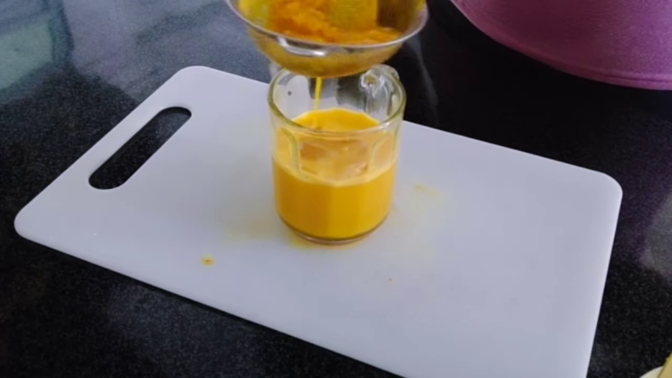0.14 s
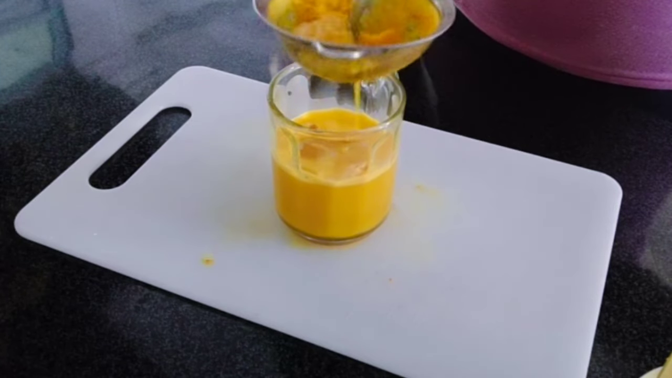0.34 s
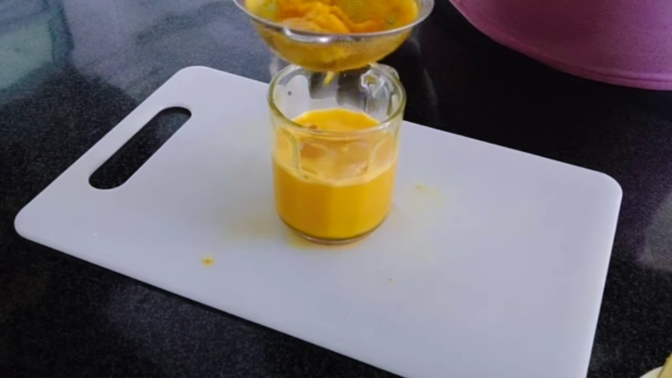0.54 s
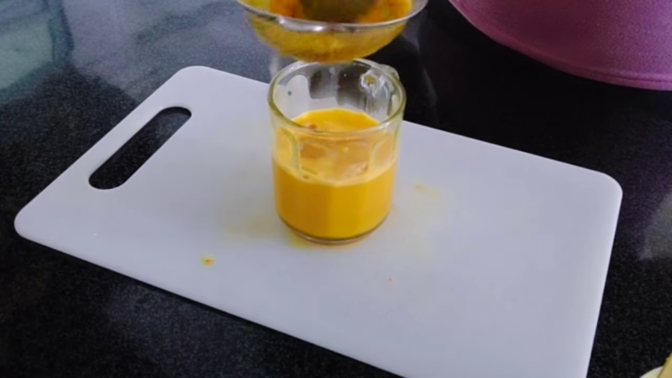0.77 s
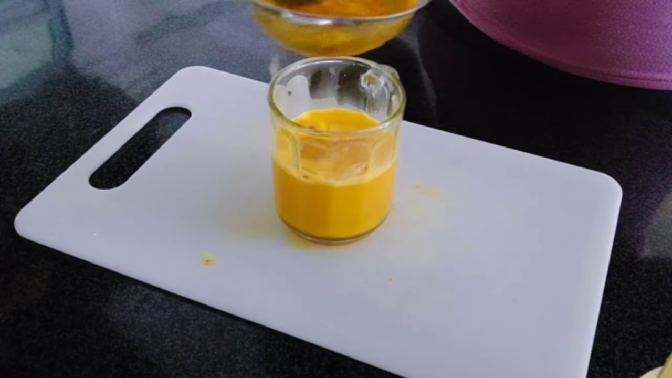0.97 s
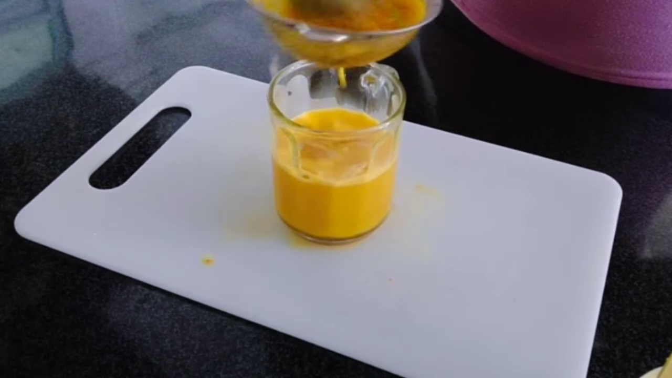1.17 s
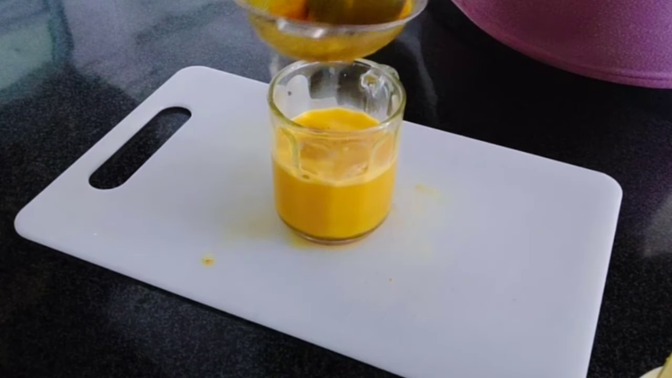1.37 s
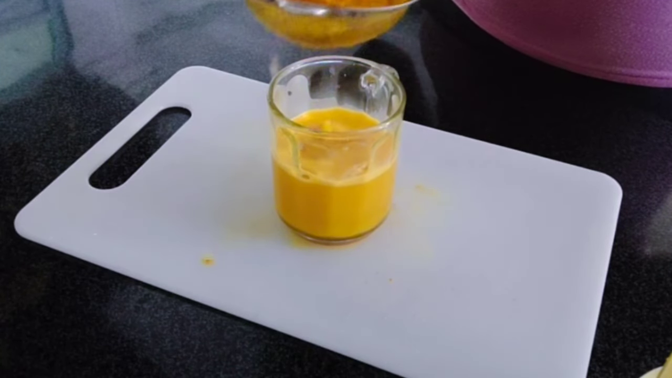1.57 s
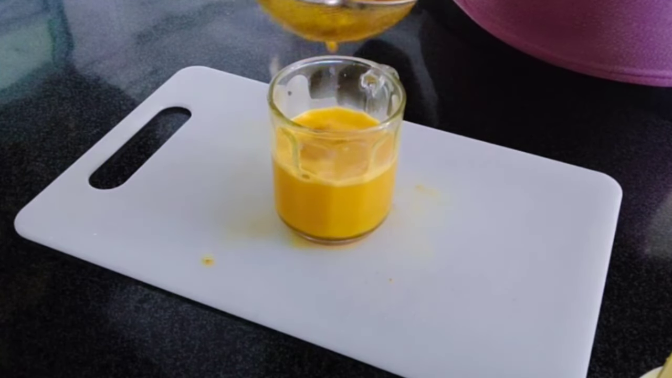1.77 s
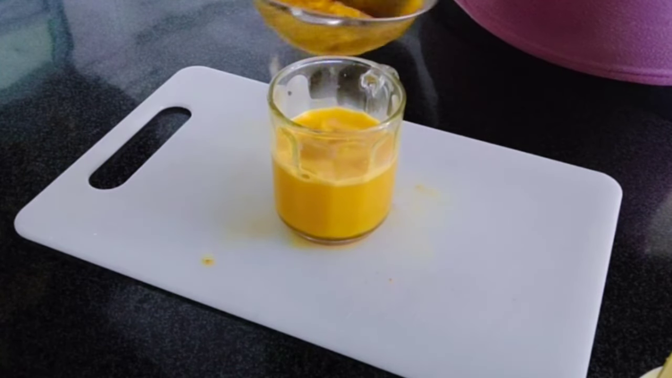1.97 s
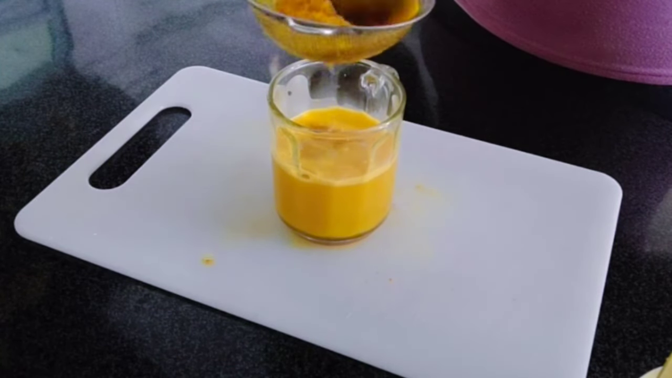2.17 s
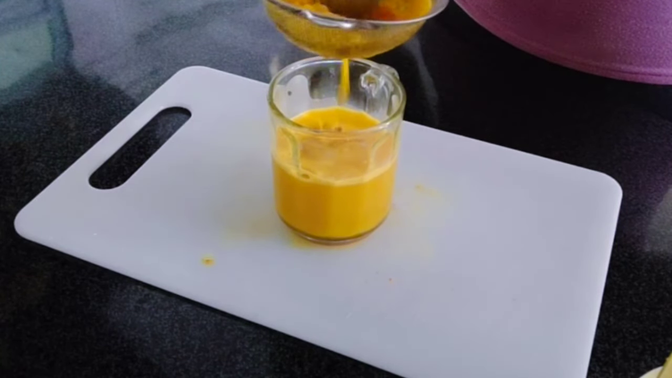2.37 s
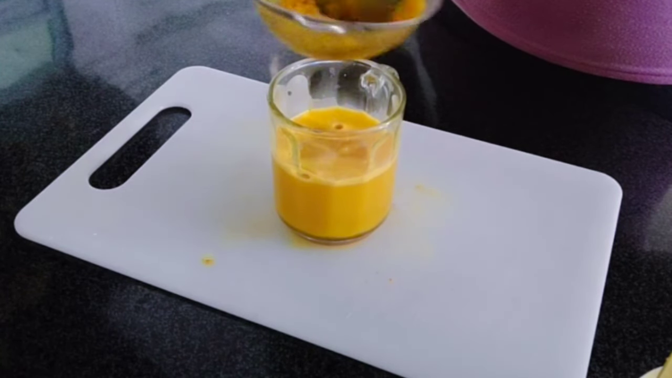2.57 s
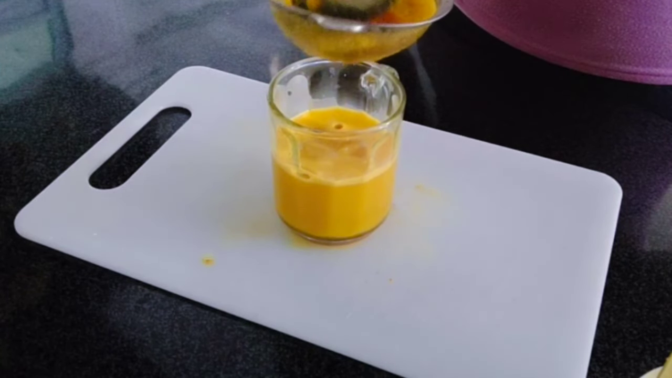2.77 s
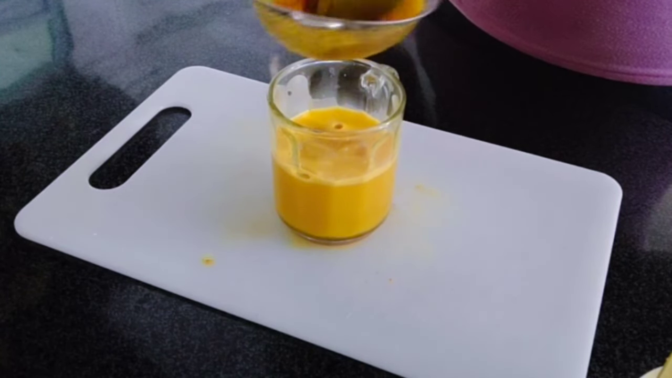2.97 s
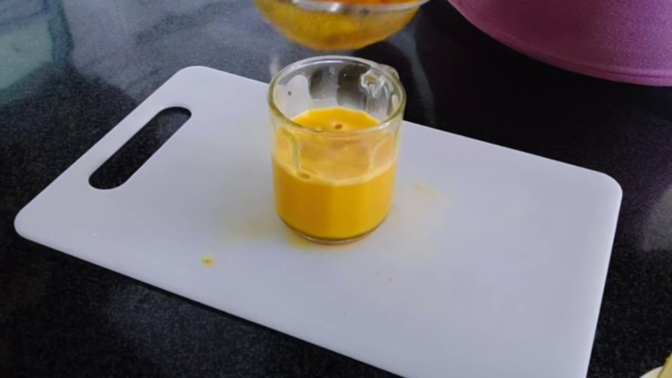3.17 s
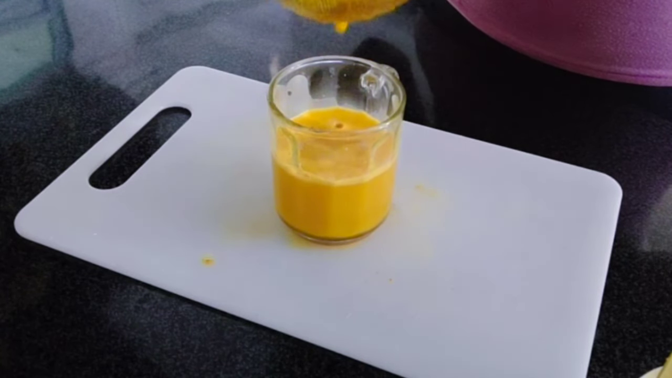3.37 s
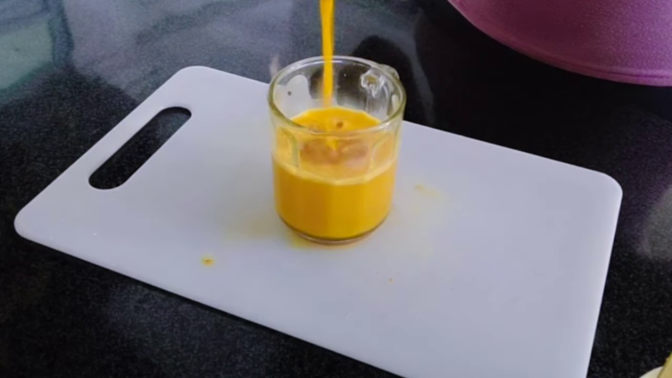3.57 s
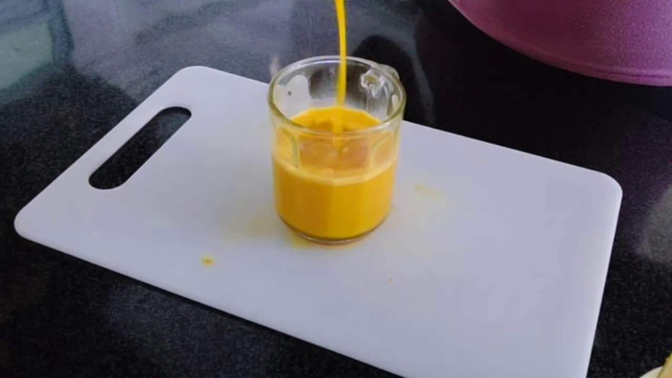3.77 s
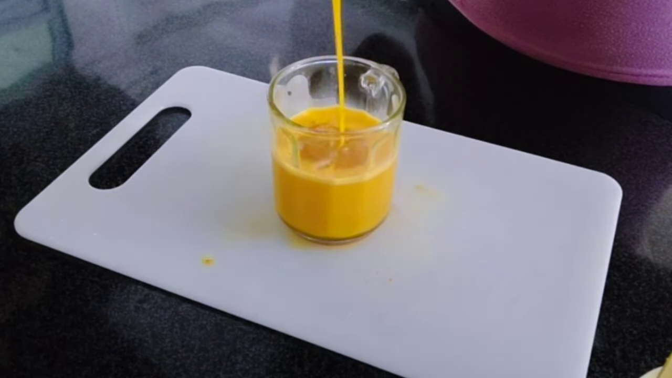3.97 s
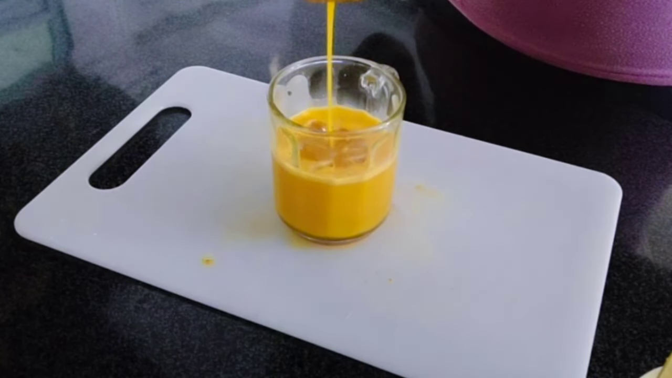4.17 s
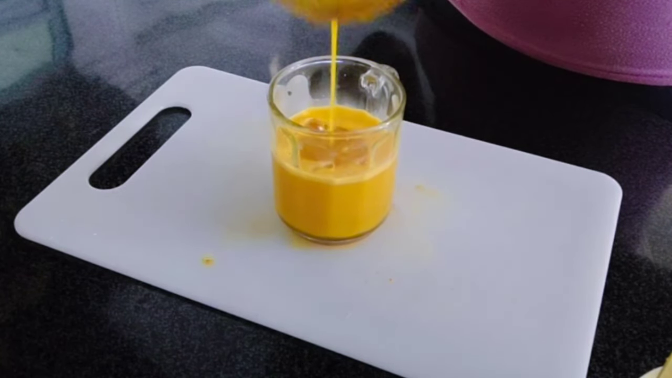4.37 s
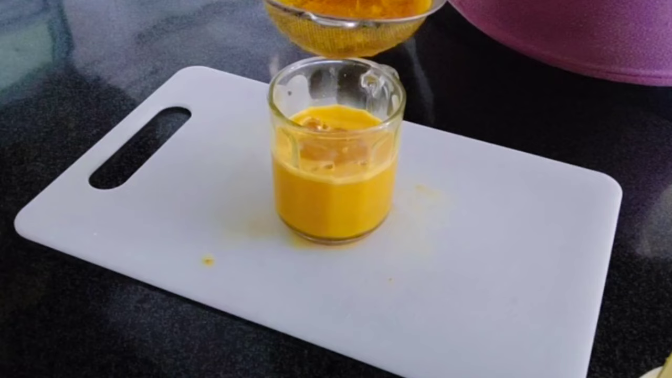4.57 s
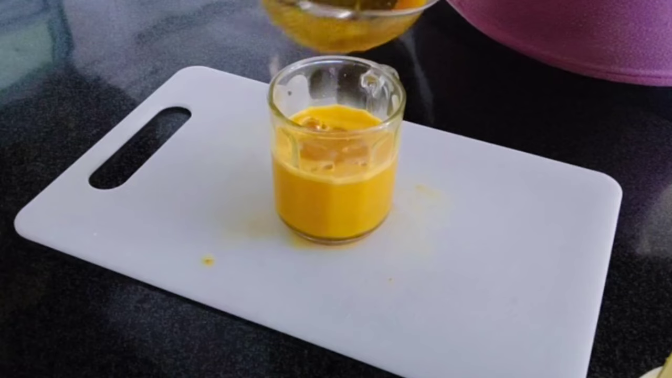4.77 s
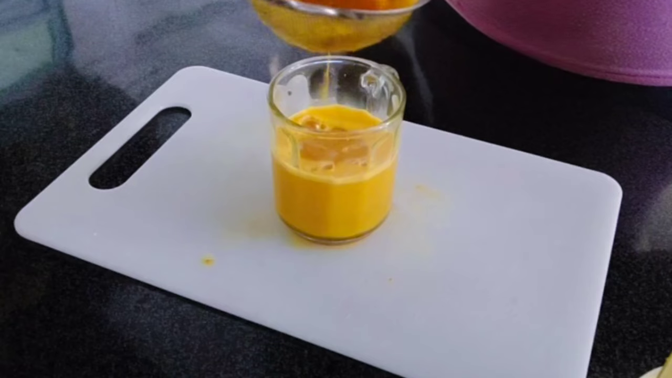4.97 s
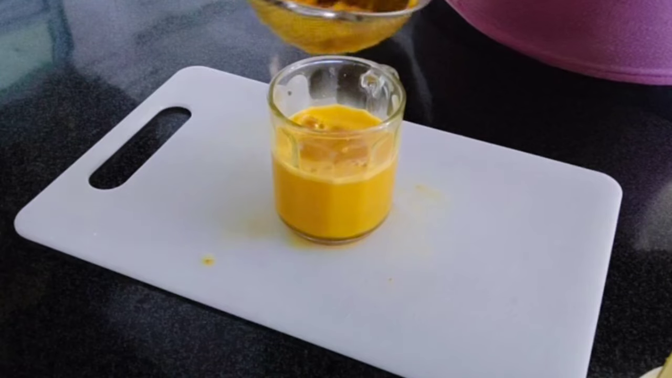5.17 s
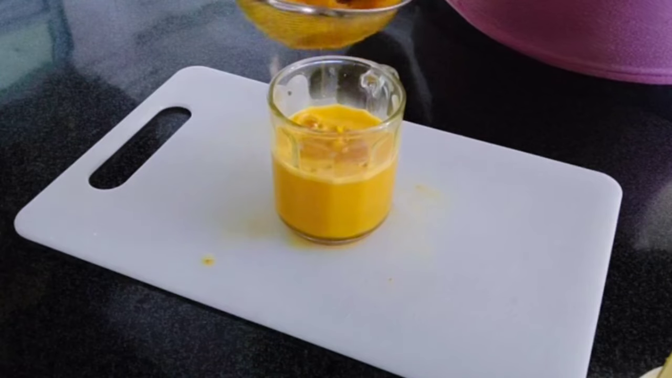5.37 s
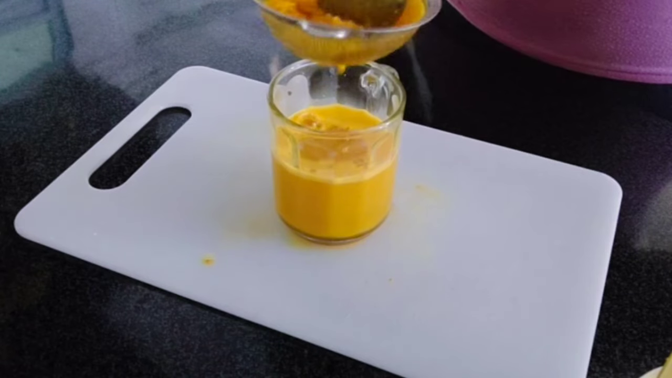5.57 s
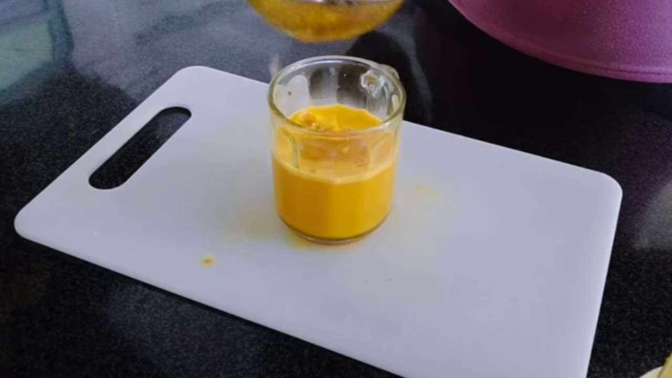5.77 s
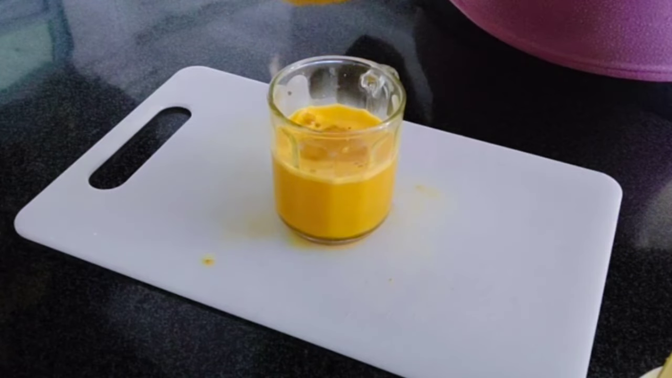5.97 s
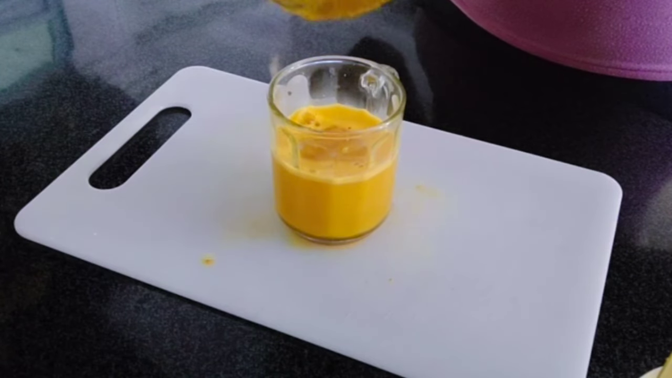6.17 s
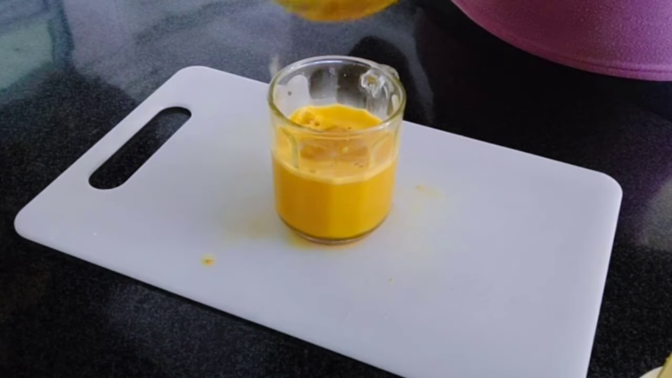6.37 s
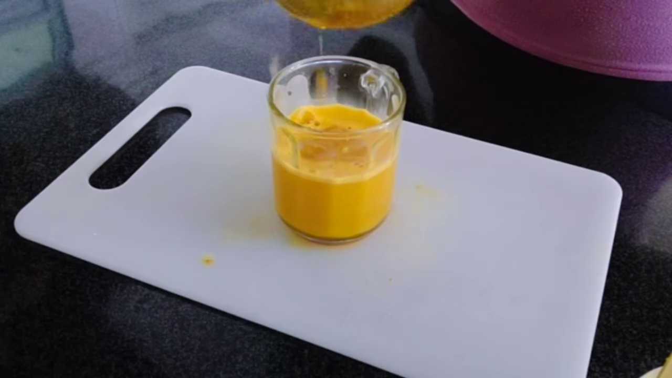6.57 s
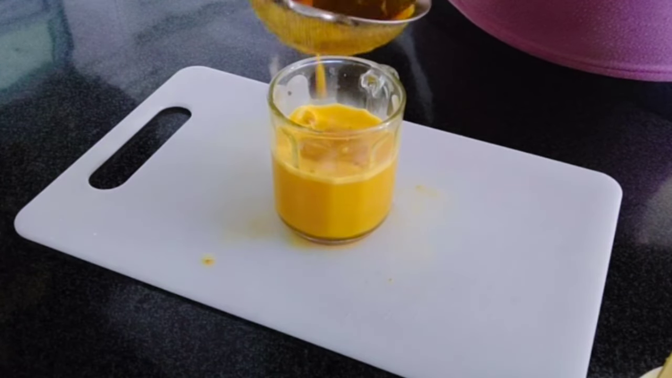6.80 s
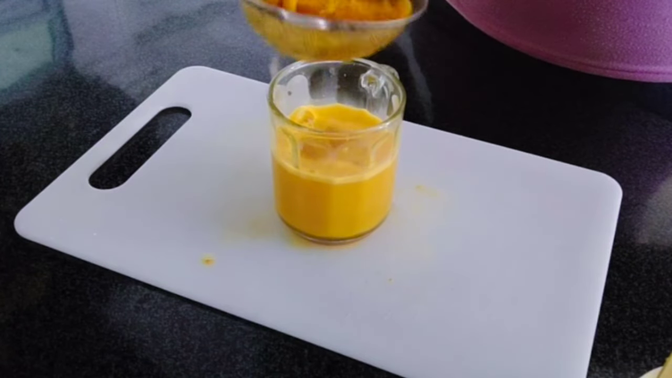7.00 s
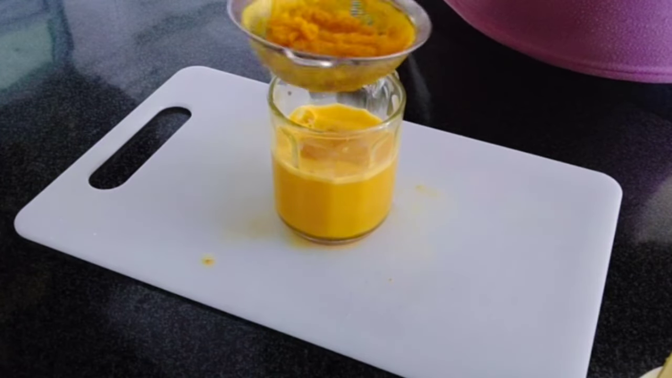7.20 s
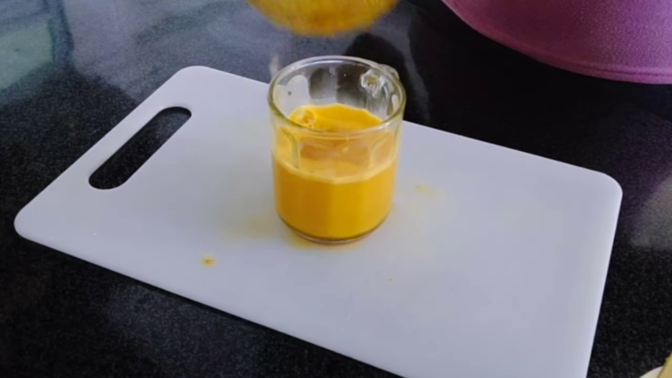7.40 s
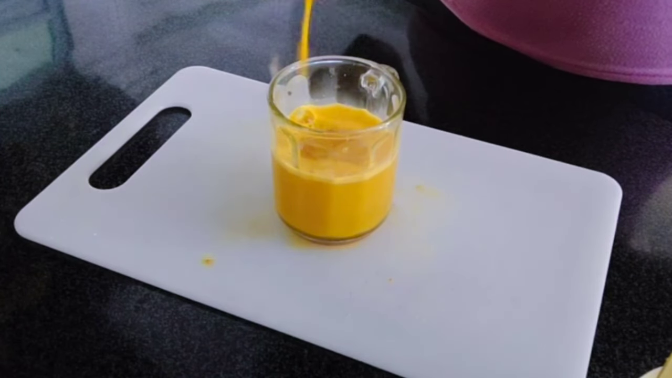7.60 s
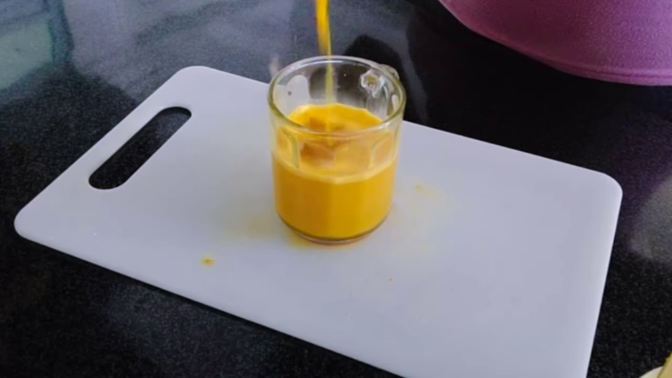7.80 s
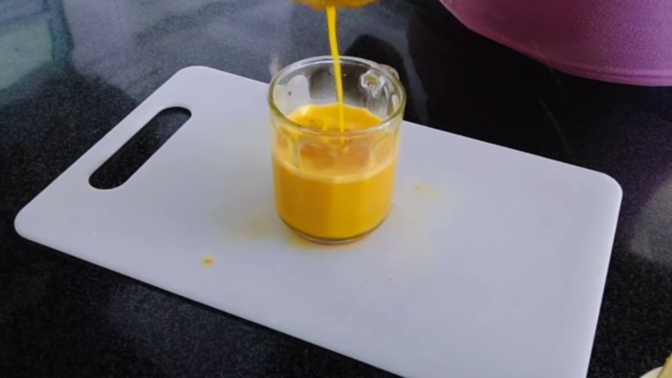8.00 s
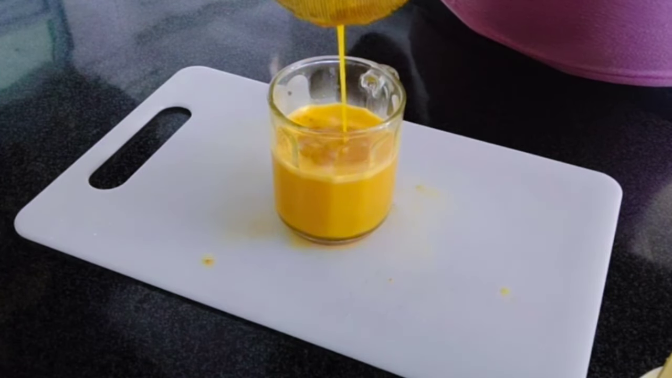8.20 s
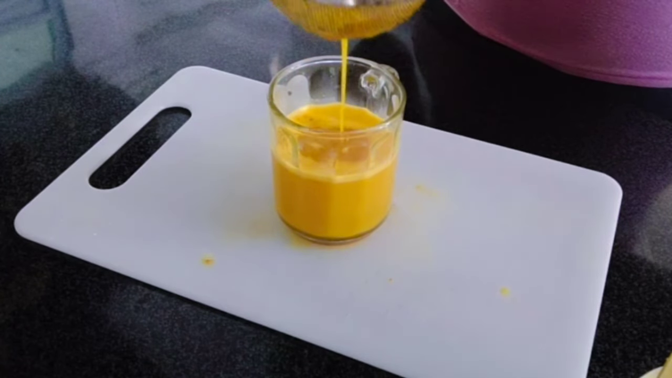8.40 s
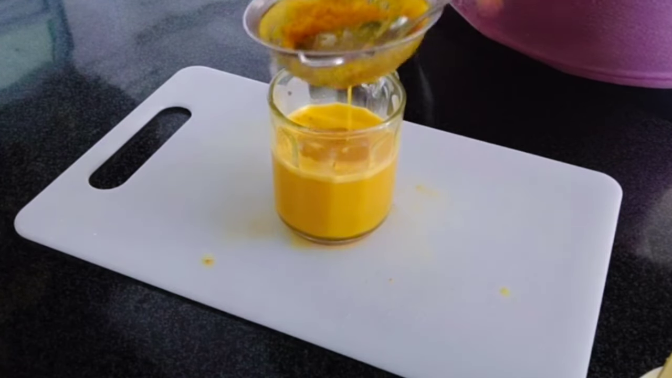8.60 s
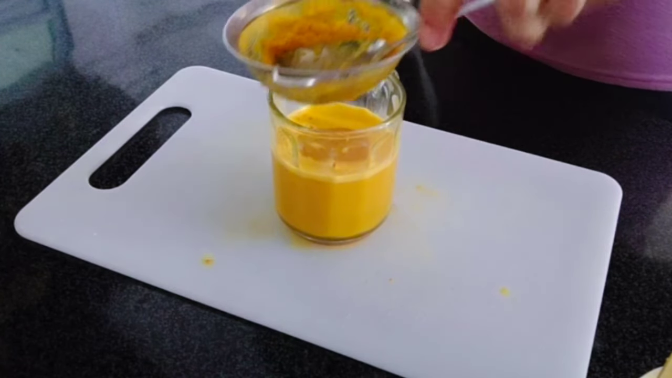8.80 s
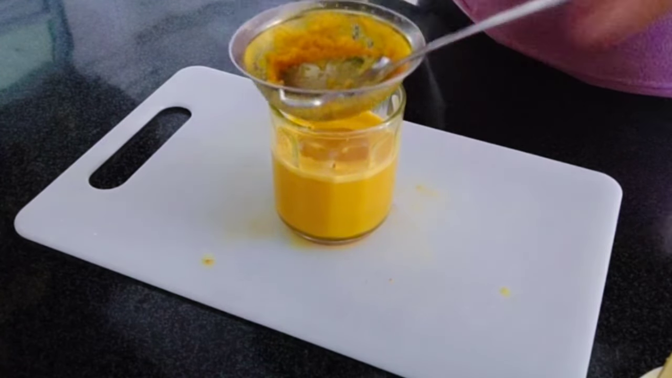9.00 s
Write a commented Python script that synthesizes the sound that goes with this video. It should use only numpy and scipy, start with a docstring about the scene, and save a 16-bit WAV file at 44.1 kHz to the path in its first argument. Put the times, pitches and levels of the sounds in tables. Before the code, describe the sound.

A spoon scrapes wet fruit pulp through a small steel mesh strainer over a glass, with sharp rim clicks, knocks and brief juice trickles in a kitchen.

```python
"""In a kitchen, a spoon works fruit pulp through a small steel mesh strainer held over a glass.
Each drag is a train of random wire plucks exciting damped mesh modes, with a wet rasp; ticks strike the rim.
Knocks, mostly between bouts, ring the frame and thud; juice trickles, and short swelling sine tones,
mostly within the knocks, waver and climb a little in pitch.
A fading hum, two far narrow-band chirps, hiss and low room rumble lie underneath."""
import sys
import numpy as np
from scipy import signal
from scipy.io import wavfile

SR = 44100
rng = np.random.default_rng(int(sys.argv[2]) if len(sys.argv) > 2 else 0)


def generate_wav(signal):
    """Clip the signal to [-1, 1] and save it as 16-bit WAV at the path in sys.argv[1]."""
    frames = np.transpose(np.atleast_2d(signal))
    scaled = np.clip(frames, -1, 1) * 32767
    pcm = np.round(scaled).astype(np.int16)
    wavfile.write(sys.argv[1], SR, pcm)


N = 399105

# spoon edge on the rim: start_s, level_db, dull_over_bright_db (modes below 3.3 kHz), left_over_right_db
RIM_TICKS = [(0.04, -27.5, -22, 5), (0.1234, -26.5, -28, -34.5), (0.631, -13.5, -40, 3),
             (1.221, -12.5, -51.5, -3), (1.608, -27, -15, -10), (1.9158, -17, -19.5, -11.5),
             (2.357, -67, -21, -17), (2.809, -17.5, -20, -2), (3.447, -42.5, -11.5, 1),
             (3.6608, -39, -0.5, -12), (3.776, -33, -9, -3), (4.7287, -22, -34, 3),
             (5.432, -22.5, -15, -16.5), (5.731, -39, -11.5, -12), (6.001, -28.5, -11.5, -12.5),
             (6.3087, -12, -23, 8.5), (6.564, -14, -17.5, 4), (7.0342, -15, -19, -12),
             (7.45, -33, -13, 4.5), (7.973, -30, -36, 2), (8.634, -38, -20.5, 14.5)]
# knocks of the strainer, and a few short rings of the mesh:
# start_s, frame_level_db, thud_over_frame_db (before loss), favoured_hz
STRAINER_KNOCKS = [(0.453, -51, -6, 2340), (1.929, -32, 5.5, 880), (3.594, -40.5, 13, 895),
                   (3.659, -37, 4.5, 2340), (3.691, -48, 22.5, 850), (3.752, -30.5, 7.5, 764),
                   (3.791, -33.5, -20, 615), (3.907, -33.5, 5.5, 710), (4.564, -52.5, 24, 790),
                   (5.047, -40, -18, 2040), (5.73, -40.5, -20, 1350), (7.718, -32.5, 6, 920),
                   (7.858, -37.5, 9.5, 2070), (7.967, -28.5, 4, 870), (8.016, -27, 7.5, 1370),
                   (8.247, -37.5, 8.5, 1896), (8.466, -48.5, 6, 1840)]
# modes of steel mesh and rim: freq_hz, level_db, t60_s
MESH_MODES = [(546.4, -12, 0.092), (806, -14.5, 0.089), (1055, -11.5, 0.068), (1355, -12.5, 0.05),
              (1503, -6.5, 0.061), (1647, -12, 0.039), (2059, -11, 0.1), (2364, -12, 0.03),
              (2623, -7, 0.05), (3150, -9, 0.067), (3567, -13, 0.013), (4380, -16, 0.0096),
              (6000, -18.5, 0.035), (7320, -5, 0.0063), (8490, -4, 0.0079)]
# modes of wire frame and handle: freq_hz, level_db, t60_s
FRAME_MODES = [(350, -4, 0.15), (524, -4, 0.17), (791, 2.5, 0.026), (914, -4, 0.043), (952, -4, 0.03),
               (1332, -7.5, 0.072), (1576, 1, 0.023), (1783, -3.5, 0.048), (2050, 4.5, 0.017),
               (2392, -4, 0.019)]


def from_db(db):
    """Amplitude gain by the decibel law: 20 dB for each factor of ten."""
    return 10 ** (np.asarray(db) / 20)


def rms_one(x):
    """Normalises the mean power, giving unit rms."""
    return x / np.sqrt(np.mean(x ** 2) + 1e-20)


def in_time(rows):
    """Linear interpolation of table columns to one value per sample."""
    s, *columns = np.transpose(rows)
    return [np.interp(np.arange(N) / SR, s, c) for c in columns]


def at_hz(points, hz):
    """Reads a spectrum by interpolation along log frequency."""
    freq_hz, value = np.transpose(points)
    return np.interp(np.log(hz), np.log(freq_hz), value)


def drift(rate_hz):
    """Slow fluctuation of unit rms: white noise through a two-pole low-pass at the given rate."""
    step = 40   # samples between slow values
    pole = np.exp(-2 * np.pi * rate_hz * step / SR)
    noise = rng.standard_normal(N // step + 2002)
    slow = signal.lfilter([1], [1, -2 * pole, pole * pole], noise)[2000:]   # the run-in is dropped
    return np.interp(np.arange(N) / step, np.arange(len(slow)), rms_one(slow))


def ring(clicks, hz, t60_s):
    """Damped resonance: a two-pole filter answers a unit click with a decaying sine of height 1."""
    pole, w = from_db(-60 / (t60_s * SR)), 2 * np.pi * hz / SR
    return signal.lfilter([0, np.sin(w)], [1, -2 * pole * np.cos(w), pole * pole], clicks + 1e-18)


def grains(per_s, spread_db):
    """Shot noise: random clicks of uneven size and sign in two unrelated rows, together of unit rms."""
    sizes_db = spread_db * np.minimum(rng.exponential(1, (2, N)), 3.5)
    sizes = from_db(sizes_db) * rng.choice([-1, 1], (2, N))
    return rms_one(sizes * (rng.random((2, N)) < per_s / SR))


def spread(pair, hz):
    """Interaural coherence: a common and an opposed part give left and right the likeness at that pitch."""
    # left-right correlation: freq_hz, likeness
    coherence = [(60, 0.76), (250, 0.72), (1000, 0.4), (3000, 0.19), (12000, 0.12)]
    alike = np.clip(at_hz(coherence, hz), -1, 1)
    common = np.sqrt(.5 + .5 * alike) * pair[0]
    opposed = np.sqrt(.5 - .5 * alike) * pair[1] * [[1], [-1]]
    return common + opposed


def bands(sources, spectrum, gain_at):
    """Subband shaping: two-thirds-octave bands of alternate sources, each with a level and a gain in time."""
    out, edges = 0, 25 * 2 ** np.arange(0, 9.7, 2 / 3)
    for k, (low, high) in enumerate(zip(edges, edges[1:])):
        hz = np.sqrt(low * high)
        if spectrum[0][0] <= hz:
            band = signal.butter(2, [low, high], "band", fs=SR, output="sos")
            pair = signal.sosfilt(band, sources[k % 2])
            out = out + from_db(at_hz(spectrum, hz)) * gain_at(hz) * spread(pair, hz)
    return out


def strike(times, modes, level_at, burst_s, scatter_db, first, rise_s=1e-5):
    """Modal excitation: a first touch and a fading random rattle drive each mode with its own strength."""
    at, out = np.round(times * SR).astype(int), np.zeros(N)
    n = np.arange(600)
    fade = np.exp(-n / (burst_s * SR)) * np.minimum(n / (rise_s * SR), 1)
    for hz, level_db, t60_s in modes:
        draw = rng.standard_normal((len(at), 601))   # the first column scatters the strength
        push = draw[:, 1:] * fade / np.sqrt(np.sum(fade ** 2))
        push[:, 0] += first
        strength = from_db(level_at(hz) + level_db + scatter_db * draw[:, 0])
        clicks = np.zeros(N)
        clicks[at[:, None] + n] = strength[:, None] * push
        out += ring(clicks, hz, t60_s)
    return out


def swells(times, levels_db, lasting_s):
    """Critically damped response: power climbs to its level in lasting_s after each moment, then drains."""
    kicks, keep = np.zeros(N), np.exp(-1 / (lasting_s * SR))
    kicks[np.round(times * SR).astype(int)] = from_db(2 * levels_db) * np.e / (lasting_s * SR)
    return signal.lfilter([1], [1, -2 * keep, keep ** 2], kicks)


def favour(hz, centre_hz, lift_db, octaves):
    """Modal participation: where the contact falls decides which modes, near one pitch, answer best."""
    return lift_db * (np.exp(-.5 * (np.log2(hz / centre_hz) / octaves) ** 2) - .5)


def pressure():
    """Contact force as gains of hiss, mesh and bowl, with the favoured pitch: drags bite or swell, then ease."""
    # spoon drags over the mesh: start_s, length_s, level_db, brightness_db, favoured_hz
    drags = [(0.0, 0.13, -59.5, 9.5, 2900), (0.114, 0.047, -45.5, 6, 2920), (0.161, 0.11, -43.5, 3.5, 2830),
             (0.2, 0.16, -46, -2, 1240), (0.63, 0.081, -49, 8, 2270), (0.67, 0.083, -43, -11.5, 950),
             (0.919, 0.03, -44.5, -4, 3330), (0.955, 0.06, -39.5, 5, 530), (0.99, 0.079, -43.5, 0.5, 1830),
             (1.216, 0.048, -46.5, 13.5, 2000), (1.277, 0.11, -40, -4.5, 470), (1.603, 0.073, -49, 4, 1350),
             (1.818, 0.088, -50, 0, 2700), (1.909, 0.15, -43, 2.5, 980), (2.06, 0.11, -45.5, -4, 1870),
             (2.195, 0.075, -50.5, 5.5, 2170), (2.275, 0.065, -49, -4.5, 1280),
             (2.355, 0.2, -45.5, -5.5, 1460), (2.444, 0.027, -42.5, -8, 1950),
             (2.535, 0.086, -44.5, -1.5, 1250), (2.804, 0.04, -59.5, 20, 2930),
             (2.84, 0.058, -41.5, 2, 620), (2.9, 0.041, -40, -7, 493), (2.98, 0.22, -75.5, 8, 3050),
             (3.41, 0.21, -70, -3.5, 3020), (4.49, 0.11, -72.5, 11, 3000), (4.726, 0.069, -49.5, 8.5, 2150),
             (4.798, 0.055, -40, -3, 1280), (5.081, 0.092, -49.5, 2.5, 2110),
             (5.15, 0.068, -44.5, -2.5, 1500), (5.324, 0.04, -43, -2.5, 1470),
             (5.345, 0.047, -42.5, 1.5, 3050), (5.42, 0.057, -52.5, 7.5, 2580),
             (5.47, 0.084, -43.5, -4.5, 1310), (5.729, 0.024, -50, 6, 1454),
             (5.782, 0.07, -56.5, 5.5, 1420), (5.865, 0.066, -48, -2, 1500),
             (5.994, 0.13, -51.5, 12.5, 3130), (6.105, 0.083, -41, -5.5, 630), (6.304, 0.18, -49, 8, 1900),
             (6.407, 0.037, -46, -18.5, 2810), (6.556, 0.03, -41, 6.5, 804), (6.607, 0.055, -45.5, 2, 2160),
             (6.661, 0.061, -38, 3.5, 554), (6.714, 0.092, -40.5, -7.5, 1255),
             (7.028, 0.12, -51.5, 5, 1290), (7.444, 0.12, -61.5, -1, 1150), (8.63, 0.12, -64, 0.5, 1050),
             (8.95, 0.45, -67.5, 2, 3660)]
    landing_s = .012   # a drag this close to a tick bites at once, others swell
    bite_s, swell_share = 0.0045, 0.22   # rise time; rise as a share of the length
    mesh_db, mesh_favoured_db = -2.5, 3.5   # mesh over the drag level; extra if the drag favours it
    bowl_follows = 0.55   # dB the bowl loses per dB of brightness
    power, favoured_hz = np.zeros((3, N + SR)), np.full(N, drags[0][-1], float)
    tick_s = np.transpose(RIM_TICKS)[0]
    for start_s, length_s, level_db, bright_db, hz in drags:
        lands = np.abs(tick_s - start_s).min() < landing_s
        rise_s = bite_s if lands else swell_share * length_s
        a, rise, whole = (round(s * SR) for s in (start_s, rise_s, length_s))
        ease = np.cos(np.linspace(0, np.pi / 2, whole - rise)) ** (2 if lands else 1.2)   # a swell holds longer
        shape = np.r_[np.linspace(0, 1, rise), ease]
        mesh_over_db = mesh_db + mesh_favoured_db * (1150 < hz < 3300)
        levels_db = level_db + np.array([bright_db, mesh_over_db, -bowl_follows * bright_db])
        power[:, a:a + whole] += from_db(2 * levels_db)[:, None] * shape
        favoured_hz[a:] = hz
    keep = np.exp(-1 / (0.022 * SR))   # squeezed pulp goes on crackling as the mesh springs back
    power += from_db(-17.5) * signal.lfilter([1 - keep], [1, -keep], power)
    return np.sqrt(power[:, :N]), favoured_hz


def background():
    """Filtered noise and a steady tone: hiss, rumble stirred by knocks and grip, a fading hum, two chirps."""
    # room hiss spectrum: freq_hz, level_db
    floor_spectrum = [(15, -39), (25, 20.5), (104, 2), (1200, -13), (4750, -20.5), (7500, -22),
                      (15500, -24.5)]
    # hum level in time: time_s, level_db
    hum_levels = [(0, -62.5), (2.6, -70), (3.4, -79.5), (3.7, -93)]
    # far chirps: start_s, level_db, t60_s
    far_chirps = [(3.325, -61.5, 1), (7.273, -59.5, 1)]
    hum_hz, chirp_hz, chirp_width_hz = 248, 6020, 210
    floor_db, rumble_db = -66.5, -76.5   # rms of the hiss; rms of the rumble at rest, before its drift
    shake_db, shake_s, grip_db = -32.5, 0.048, -38   # over each thud; its swell time; over the loaded bowl

    white = rng.standard_normal((2, 2, N))
    hiss = from_db(floor_db) * rms_one(bands(white, floor_spectrum, lambda hz: from_db(3.3 * drift(0.62))))

    low_band = signal.butter(2, [72, 180], "band", fs=SR, output="sos")
    low = signal.sosfilt(low_band, rng.standard_normal(N))
    knock_s, frame_db, thud_db, _ = np.transpose(STRAINER_KNOCKS)
    shaken = swells(knock_s, frame_db + thud_db + shake_db, shake_s)
    gripped = (from_db(grip_db) * pressure()[0][2]) ** 2
    rumble = np.sqrt(from_db(2 * rumble_db) + shaken + gripped) * from_db(2.0 * drift(6)) * rms_one(low)

    t = np.arange(N) / SR
    hum_gain = from_db(in_time(hum_levels)[0] + 3.2 * drift(50.0))
    hum = hum_gain * np.sin(2 * np.pi * hum_hz * t + 0.05 * drift(5.3))

    edges = [chirp_hz - chirp_width_hz / 2, chirp_hz + chirp_width_hz / 2]
    narrow = rms_one(signal.sosfilt(signal.butter(2, edges, "band", fs=SR, output="sos"), white[0]))
    chirp_gain = sum((t >= s) * from_db(level_db - 60 * np.maximum(t - s, 0) / t60_s)
                     for s, level_db, t60_s in far_chirps)
    return hiss + rumble + hum * from_db([[-1.5], [1.5]]) + narrow * chirp_gain


def kitchen(x):
    """Recirculating reflections: six feedback delays a side, each a little duller on every round."""
    t60_s, wall_cut_hz = 0.46, 23700
    out, dull = np.zeros((2, N)), np.exp(-2 * np.pi * wall_cut_hz / SR)
    for k, lag in enumerate((np.geomspace(.013, .041, 12) * SR).astype(int)):
        loop, gain, state = x.copy(), from_db(-60 * lag / SR / t60_s), [0.]
        for i in range(lag, N, lag):   # one round at a time
            back, state = signal.lfilter([gain * (1 - dull)], [1, -dull], loop[i - lag:i], zi=state)
            loop[i:i + lag] += back[:N - i]
        out[k % 2] += (loop - x) * (-1) ** (k // 2)
    return out


def trickle():
    """Resonance under random impacts: juice leaving the mesh rings frame modes; pours add a fine spatter."""
    # threads of juice running into the glass: start_s, level_db
    juice_pours = [(3.929, -60.5), (7.98, -59)]
    # air in the glass colours the spatter: freq_hz, level_db
    glass_air = [(2300, 4.5), (2950, 1.5), (3600, 0), (5100, 2.5)]
    runoff_db, runoff_s = -23, 0.029   # juice shaken loose, over the frame level; its time to swell
    pour_s = .065   # time for a pour to swell

    pops = [grains(500, spread_db=2.0) for _ in range(2)]
    murmur = 0
    for k, (hz, level_db, t60_s) in enumerate(FRAME_MODES[1:]):
        gain = from_db(level_db + 5.5 * drift(12))   # the modes come forward in turn
        upper = ring(pops[k % 2], hz * 1.03, 0.04 + t60_s)
        lower = ring(pops[1 - k % 2], hz / 1.03, 0.03 + t60_s)
        murmur = murmur + gain * rms_one(spread(upper + lower, hz))

    spatter_band = signal.butter(2, [800, 6500], "band", fs=SR, output="sos")
    spatter = signal.sosfilt(spatter_band, grains(9000, spread_db=3.0))
    coloured = sum(from_db(db + 4.0 * drift(8)) * ring(spatter, hz, 0.03) for hz, db in glass_air)
    spatter = rms_one(spatter) + rms_one(coloured)

    knock_s, frame_db = np.transpose(STRAINER_KNOCKS)[:2]
    flow = from_db(runoff_db) * np.sqrt(swells(knock_s, frame_db, runoff_s)) * from_db(1.5 * drift(17))
    pour = np.sqrt(swells(*np.transpose(juice_pours), pour_s)) * from_db(1.0 * drift(12))
    return flow * rms_one(murmur) + pour * rms_one(spread(spatter, 13000))


def short_tones():
    """Amplitude and frequency modulation: short sines that swell, waver, climb a little in pitch and die."""
    # short tones, mostly within the knocks: start_s, pitch_hz (at the crest), level_db, half_length_s
    tones = [(3.592, 1505, -43.5, 0.027), (3.586, 885, -48.5, 0.035), (3.659, 1550, -43, 0.012),
             (3.851, 1260, -49, 0.024), (3.852, 1520, -43, 0.012), (3.907, 2385, -31, 0.0052),
             (3.908, 1514, -36, 0.02), (4.524, 1765, -63, 0.03), (4.559, 1767, -55, 0.029),
             (8.038, 808, -42.5, 0.033), (8.18, 1024, -48, 0.064)]
    crest, rise = 0.31, 0.014   # time to the crest in half lengths; relative rise of pitch per half length
    out, waver = np.zeros(N), from_db(5.0 * drift(70))
    for s, hz, level_db, half_s in tones:
        share = np.arange(round(2 * half_s * SR)) / (half_s * SR)
        shape = share / crest * np.exp(1 - share / crest) * np.cos(np.pi / 4 * share)
        phase = 2 * np.pi * np.cumsum(hz * (1 + rise * (share - crest))) / SR
        out[round(s * SR):][:len(share)] += from_db(level_db) * shape * np.sin(phase)
    return out * waver


def knocks():
    """Soft impact: a slow push rings the frame and snaps the wires, with a thud through hand and worktop."""
    # modes of hand and worktop: freq_hz, level_db, t60_s
    thud_modes = [(80, -10.5, 0.11), (113, -6, 0.17), (162.6, -1, 0.056)]
    thud_loss_db = 16.5   # what the hand soaks up of a knock
    s, frame_db, thud_db, favoured_hz = np.transpose(STRAINER_KNOCKS)
    frame = strike(s, FRAME_MODES,
                   lambda hz: frame_db - 6 + favour(hz, favoured_hz, lift_db=14.0, octaves=0.08),
                   0.008, 2.5, first=0.05, rise_s=.004)
    thud = strike(s, thud_modes, lambda hz: frame_db + thud_db - thud_loss_db, 0.003, 2.0, first=1.5)
    snap = strike(s, [(3540, -15.5, 0.0095), (6300, 1.5, 0.00095)], lambda hz: frame_db,
                  0.014, 2.5, first=0.16, rise_s=0.0015)
    return frame + snap + signal.lfilter(*signal.butter(2, 400, fs=SR), thud)


def ticks():
    """Hard impact: the spoon edge on the steel rim rings mesh modes with a broad crack, placed left or right."""
    s, level_db, dull_db, pan_db = np.transpose(RIM_TICKS)
    rings = strike(s, MESH_MODES, lambda hz: level_db - 5.0 + dull_db * (hz < 3300) - 9 * (hz < 1150),
                   0.0014, 1.5, first=0.05)
    crack = strike(s, [(2870, 13.0, 0.0029), (4720, -5.5, 0.0022), (7750, -11.0, 0.0029)],
                   lambda hz: level_db + dull_db * (hz < 3300), 0.0035, 0.94, first=0.15)
    # each placing holds until the next tick
    side_db = np.repeat(pan_db, np.diff(np.r_[0, np.round(s[1:] * SR).astype(int), N]))
    # a small rim radiates little bass
    thin = signal.sosfilt(signal.butter(2, 600, "high", fs=SR, output="sos"), rings + crack)
    return thin * from_db(side_db * [[.5], [-.5]])


def strokes():
    """Stick-slip friction: plucked wires ring damped mesh modes over a wet rasp; wires crossed jolt the bowl."""
    # spectrum of the wet rasp: freq_hz, density_db (per Hz)
    rasp_spectrum = [(150, -34), (250, 3), (534, -2.5), (717, -2), (1890, -1), (4100, 1.5), (8470, -13),
                     (15500, -20)]
    wires_per_s, jolt_db = 480, -11   # typical rate of wires crossed; their jolt over the bowl
    stretch_s = .001   # rms wander of the mesh ring in time
    free_db, free_longer = -28, 10   # bare mesh beyond the pulp rings faintly, this many times longer
    gains, favoured_hz = pressure()
    hiss, mesh, bowl = gains * from_db(1.1 * drift(39))   # the spoon sticks and slips

    def gain_at(hz):
        """Division by frequency: the bowl answers below 1.15 kHz, the mesh up to 3.3 kHz, the hiss above."""
        return bowl if hz < 1150 else mesh if hz < 3300 else hiss

    # two sparse trains for the low modes, a dense one for the high
    plucks = [grains(300, spread_db=3.5) for _ in range(2)] + [grains(2500, spread_db=3.5)]
    rings = 0
    for k, (hz, level_db, t60_s) in enumerate(MESH_MODES):
        drive_db = level_db + 3.5 * drift(30) + favour(hz, favoured_hz, lift_db=13.0, octaves=0.15)
        ring_norm = np.sqrt(t60_s * SR / 4 / np.log(1000))   # evens out the power of long and short rings
        drive = plucks[k % 2 if hz < 3300 else 2] * gain_at(hz) * from_db(drive_db) / ring_norm
        # pulp splits each mode in two
        split = np.array([ring(drive[0], hz / 1.02, t60_s), ring(drive[1], hz * 1.02, t60_s)])
        rings = rings + spread(split, hz)
        if 900 < hz < 3300:
            rings = rings + from_db(free_db) * ring(drive[0], hz, free_longer * t60_s)
    # the mesh stretches under the spoon, so its modes wander in pitch
    read = np.arange(N) + stretch_s * SR * drift(4)
    rings = np.array([np.interp(read, np.arange(N), side) for side in rings])

    def rasp_gain(hz):
        """Band gain: contact force, a random flutter and a broad lift at the favoured pitch."""
        return gain_at(hz) * from_db(2.5 * drift(24) + favour(hz, favoured_hz, lift_db=4.0, octaves=0.59))

    rasp = bands([grains(5000, spread_db=4.5) for _ in range(2)], rasp_spectrum, rasp_gain)

    wire_rate = wires_per_s * from_db(2.0 * drift(30) + 1.5 * drift(150))
    crossed = np.diff(np.floor(np.cumsum(wire_rate / SR)), prepend=0)   # 1 at each wire
    jolts = -crossed * from_db(5.5 * rng.standard_normal(N) + 3.0 * drift(66))
    jolt_band = signal.butter(2, [450, 2200], "band", fs=SR, output="sos")
    jolts = rms_one(signal.sosfilt(jolt_band, jolts))
    return from_db(1.5) * rings + from_db(4.0) * rasp + from_db(jolt_db) * bowl * jolts


def scene():
    """Superposition of direct and reflected sound: the strainer is nearer the right, so the left lags."""
    left_lag, kitchen_db = 4, -19.5   # samples; level of the reflections
    blows = knocks()
    near = strokes() + ticks() + short_tones() + blows + trickle()
    near[0] = np.r_[np.zeros(left_lag), near[0, :-left_lag]]
    to_walls = near[1] + from_db(3.0) * blows   # knocks shake the room more than the spoon does
    walls = signal.lfilter(*signal.butter(2, 280, "high", fs=SR), to_walls)   # bass stays close
    return near + from_db(kitchen_db) * kitchen(walls) + background()


def record(dry):
    """Band-limiting: the microphone loses the deepest bass and a steep low-pass cuts the top."""
    cutoff_hz = 16400   # 70 dB down from here
    lean = signal.sosfilt(signal.butter(4, 68, "high", fs=SR, output="sos"), dry)
    return signal.sosfilt(signal.cheby2(12, 70, cutoff_hz, fs=SR, output="sos"), lean)


dry = scene()
out = record(dry)
generate_wav(out)
```